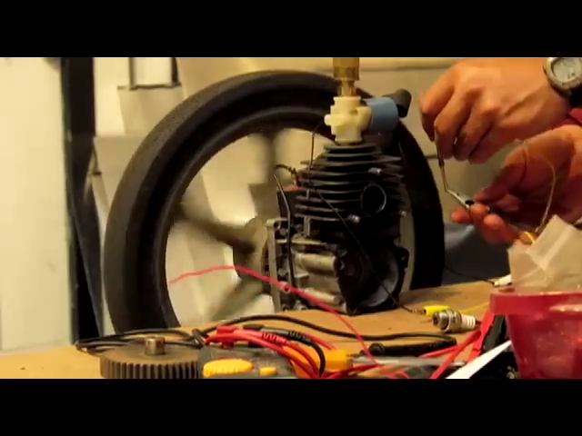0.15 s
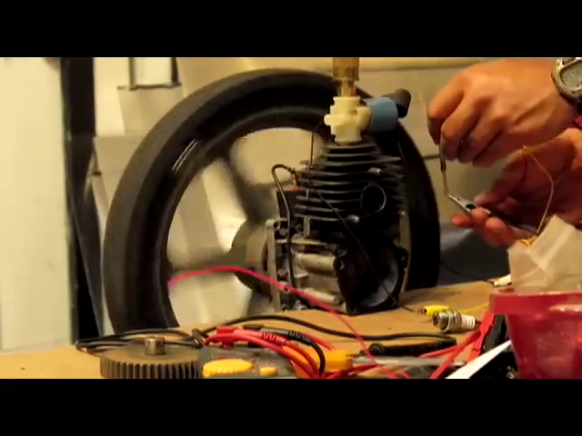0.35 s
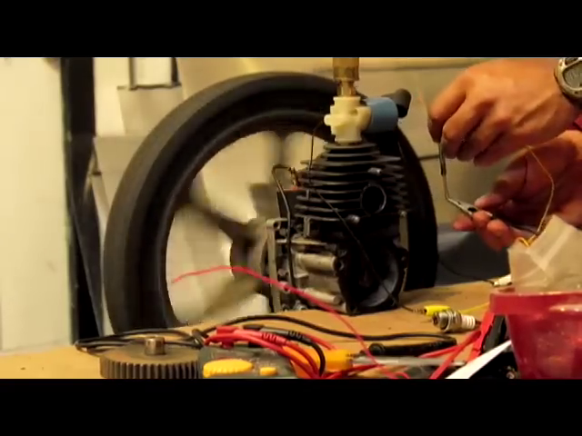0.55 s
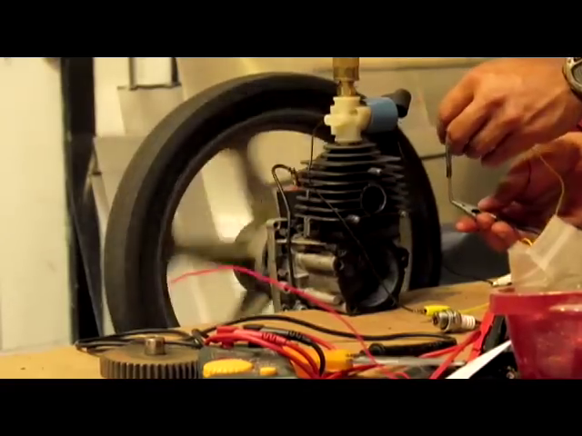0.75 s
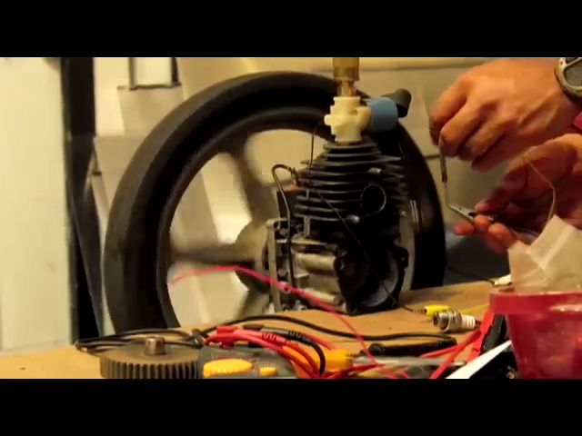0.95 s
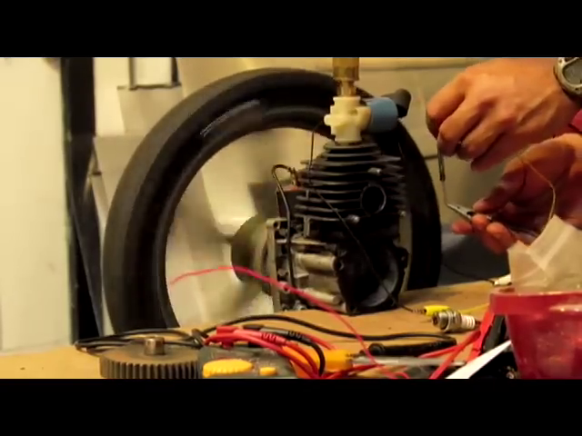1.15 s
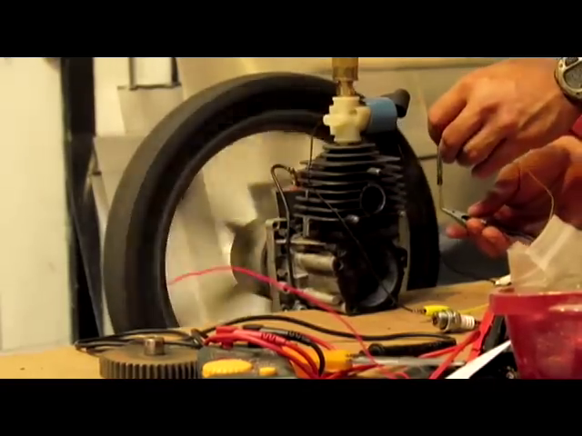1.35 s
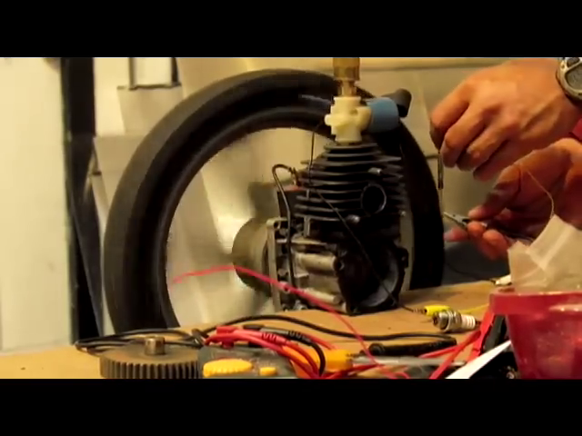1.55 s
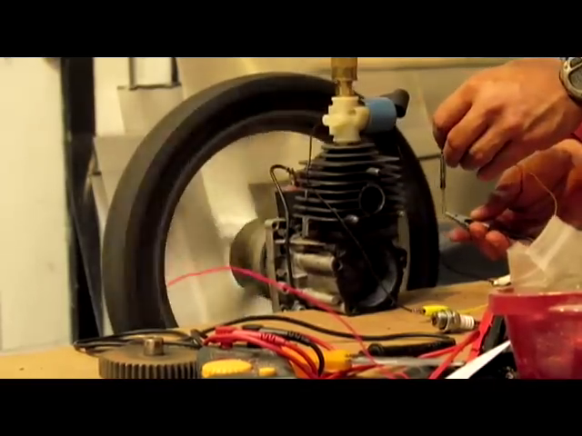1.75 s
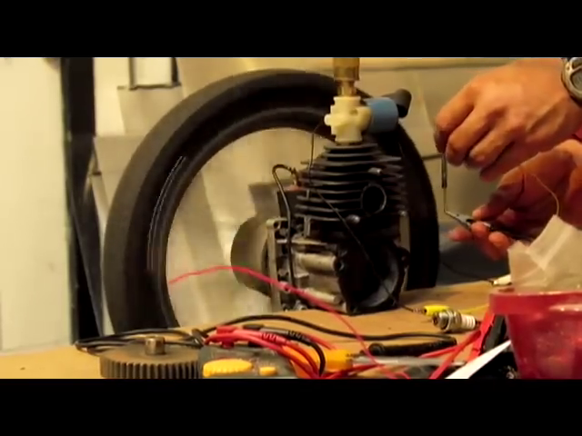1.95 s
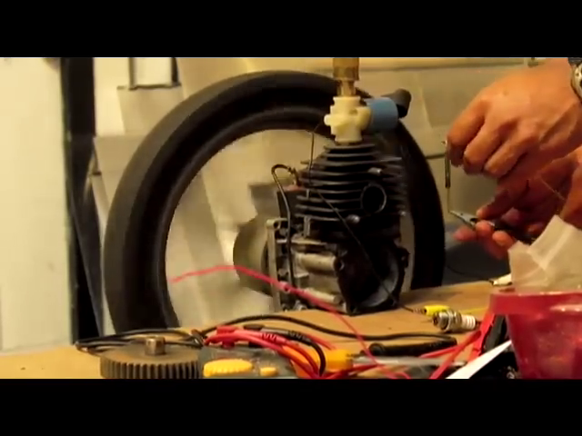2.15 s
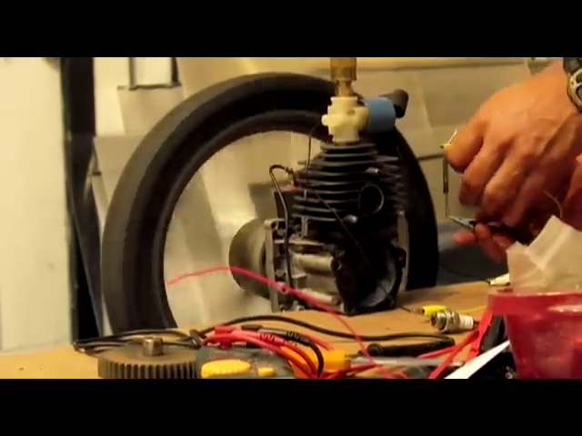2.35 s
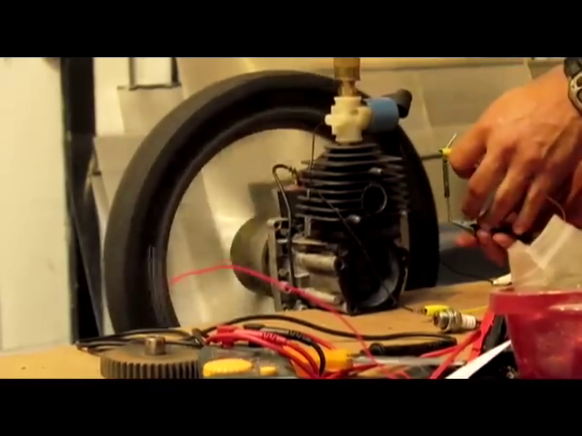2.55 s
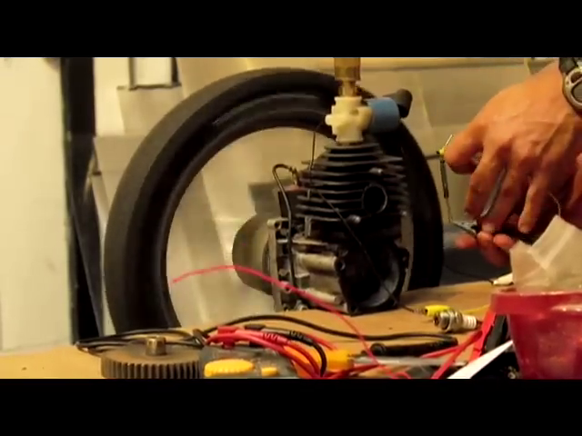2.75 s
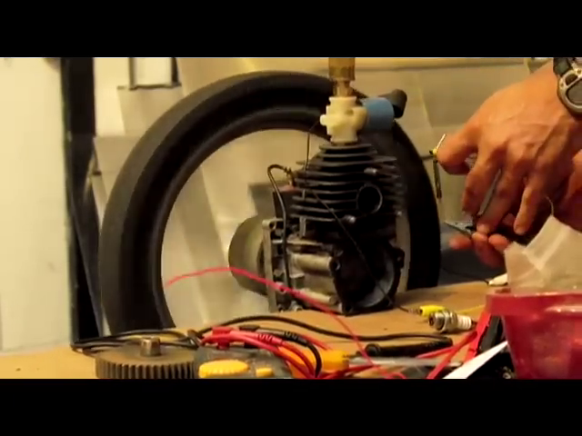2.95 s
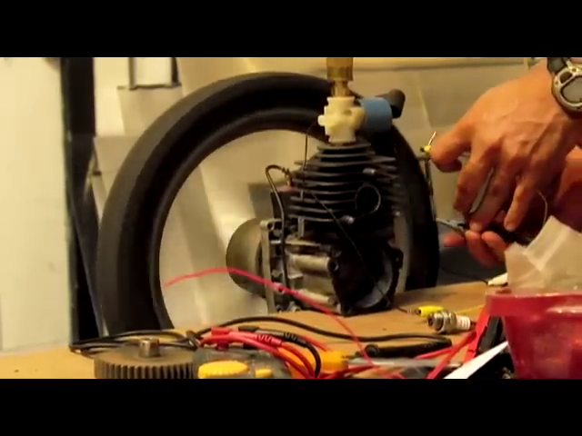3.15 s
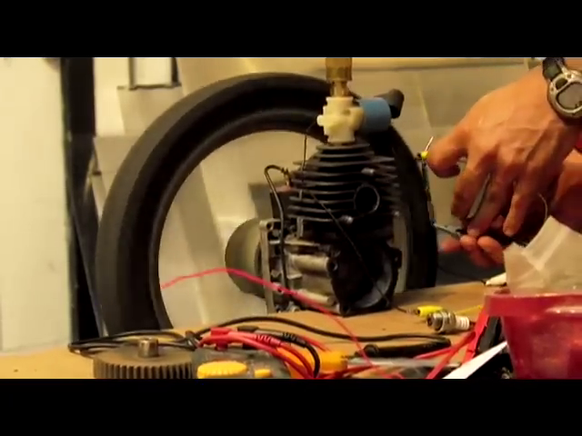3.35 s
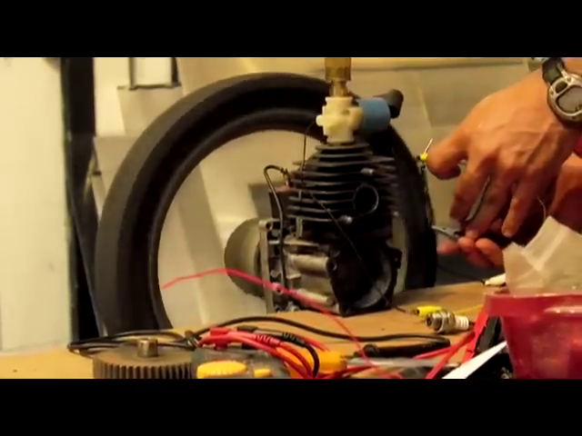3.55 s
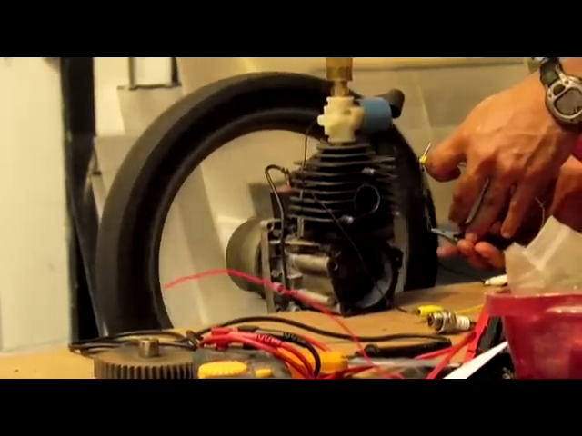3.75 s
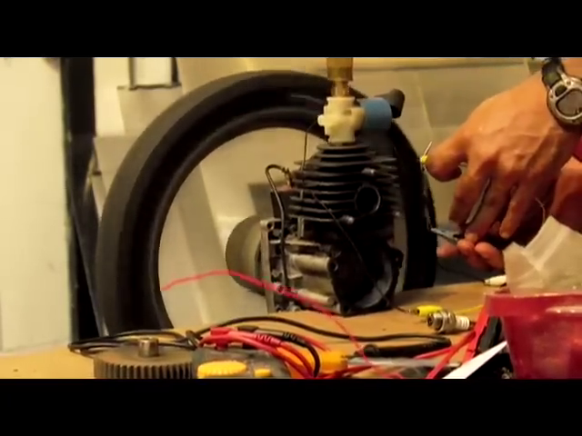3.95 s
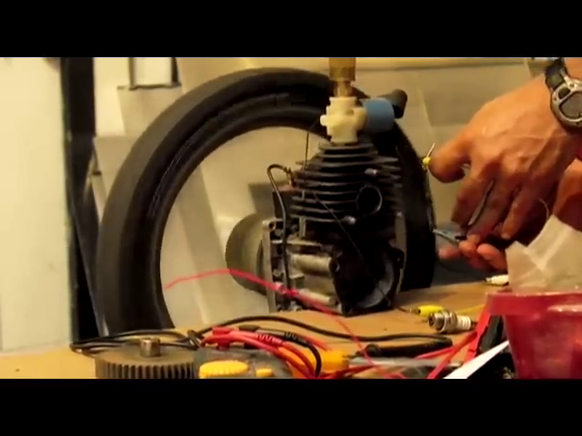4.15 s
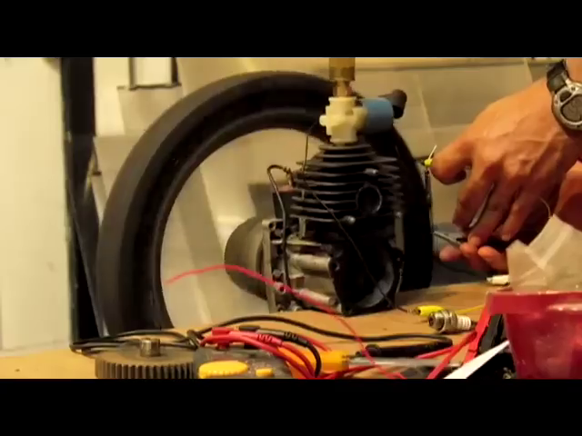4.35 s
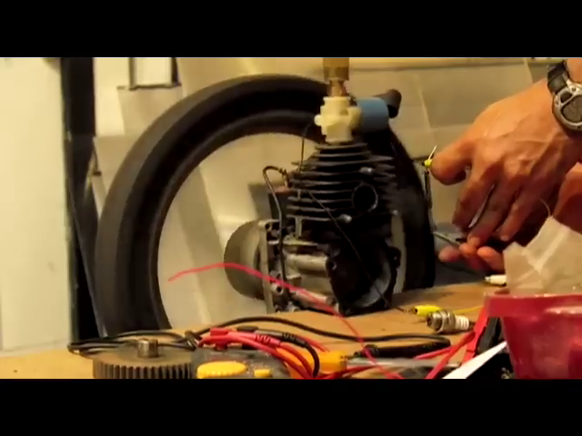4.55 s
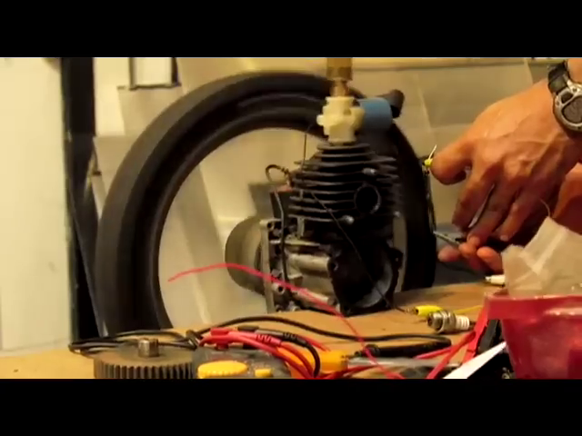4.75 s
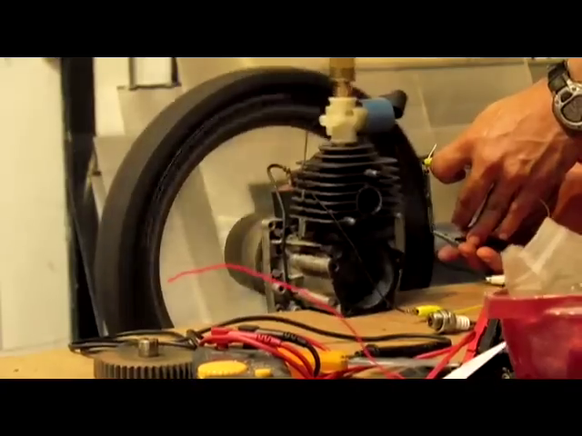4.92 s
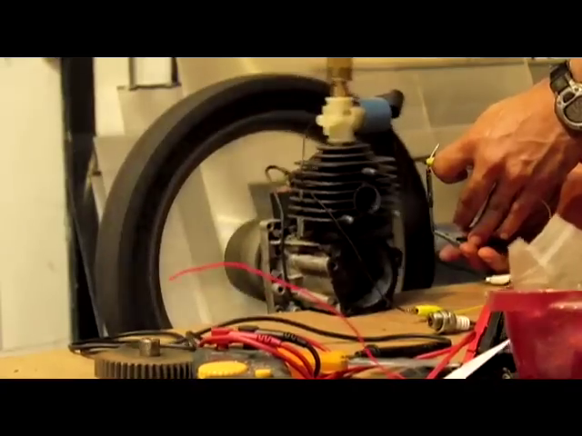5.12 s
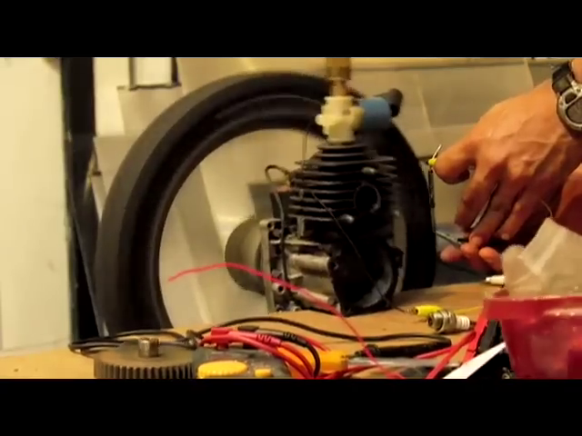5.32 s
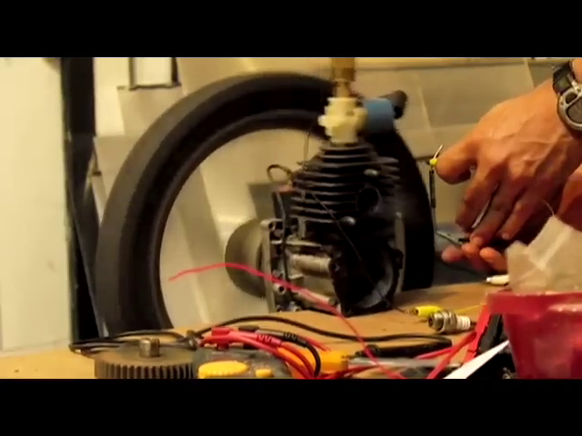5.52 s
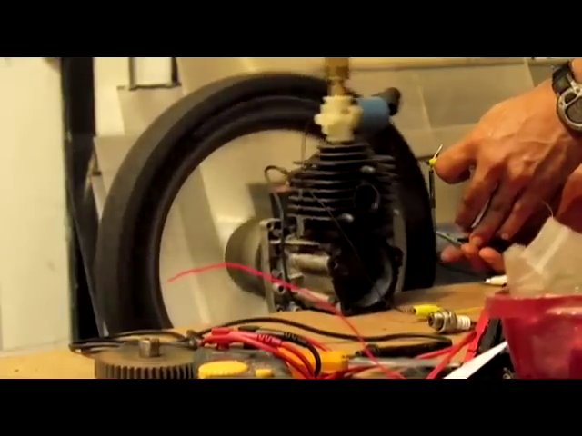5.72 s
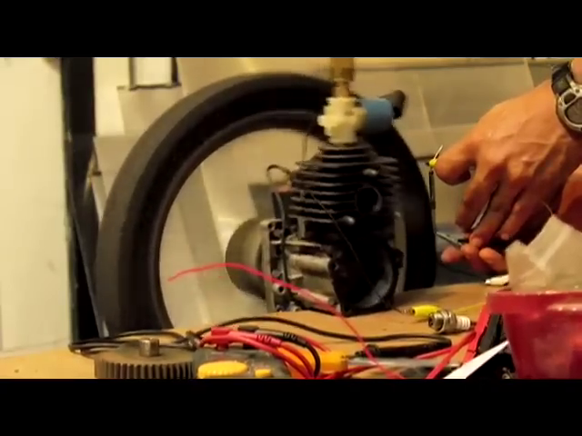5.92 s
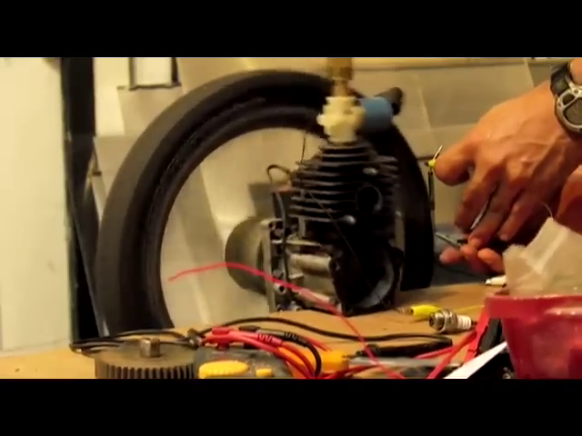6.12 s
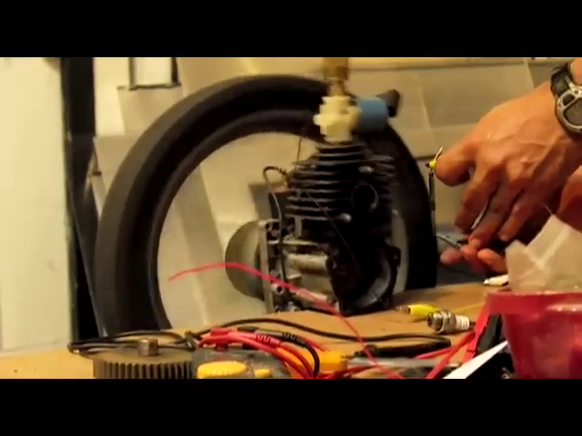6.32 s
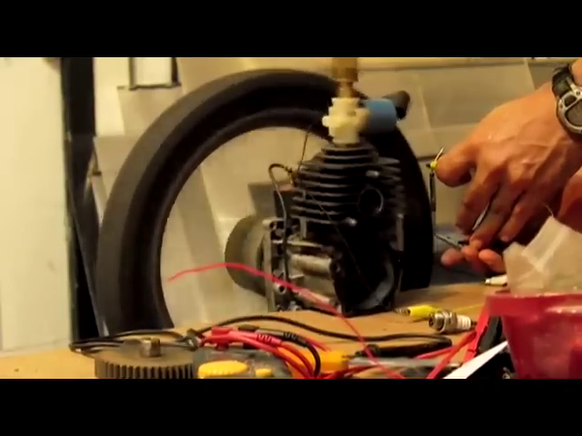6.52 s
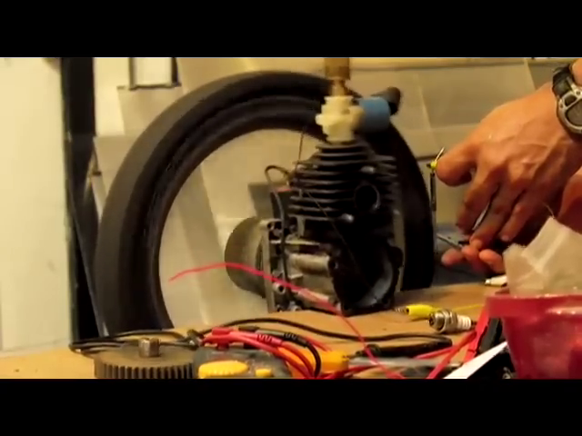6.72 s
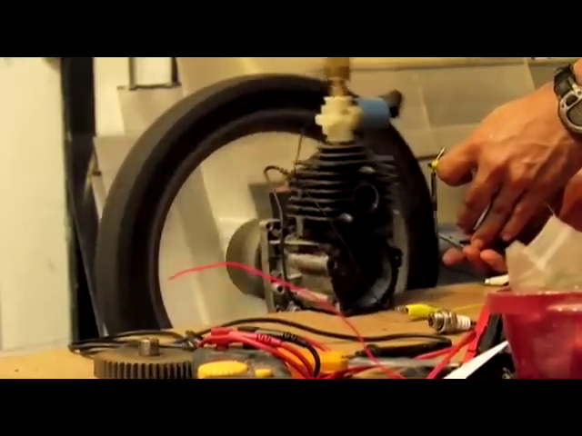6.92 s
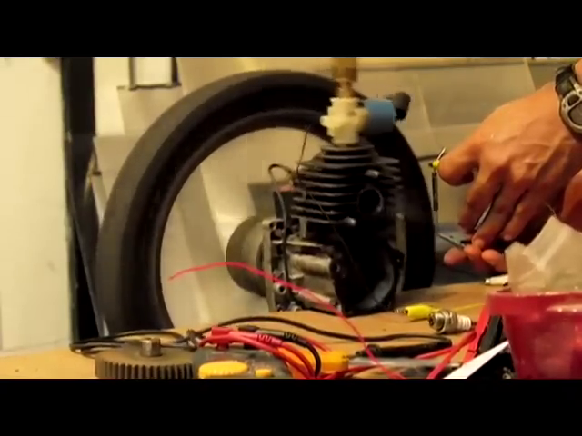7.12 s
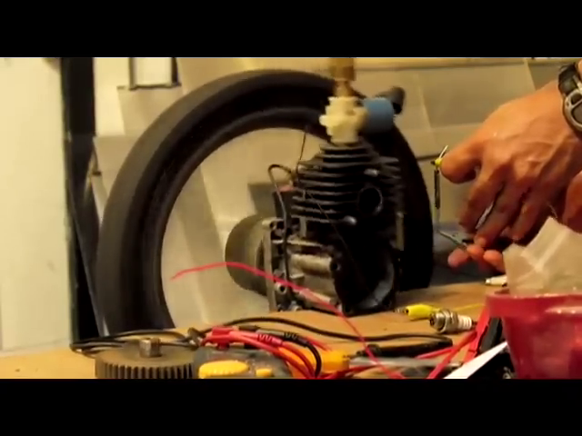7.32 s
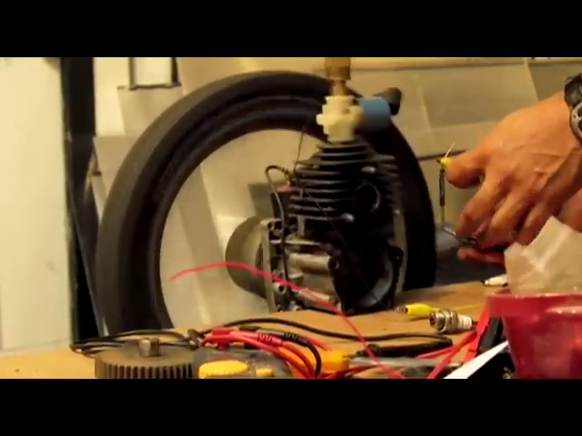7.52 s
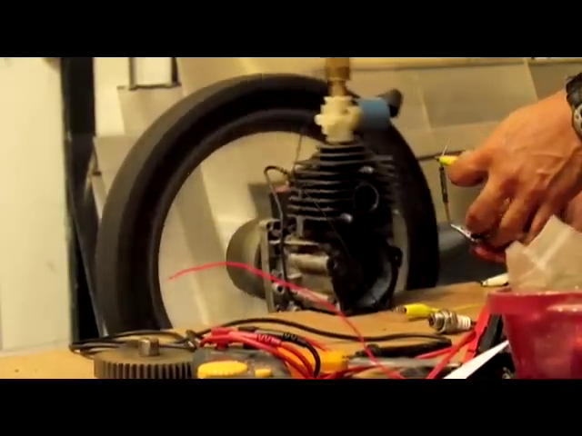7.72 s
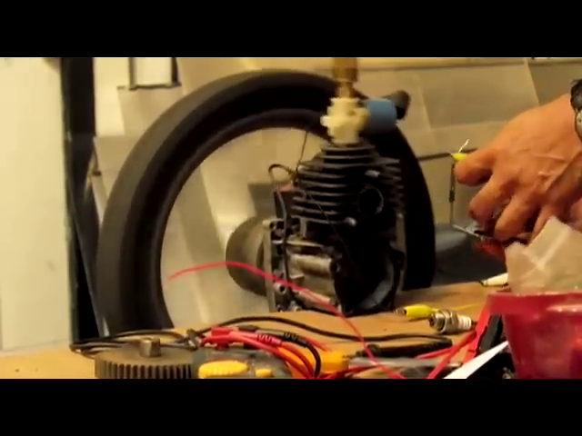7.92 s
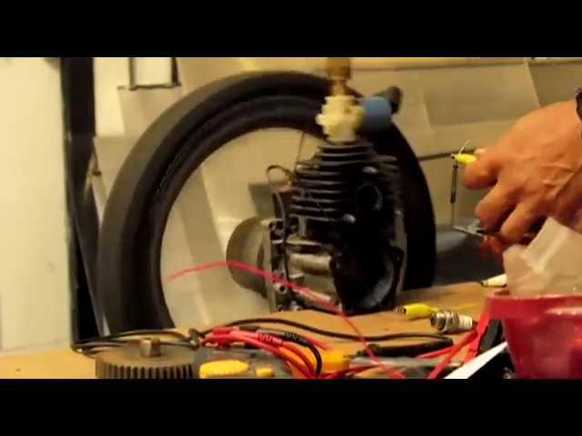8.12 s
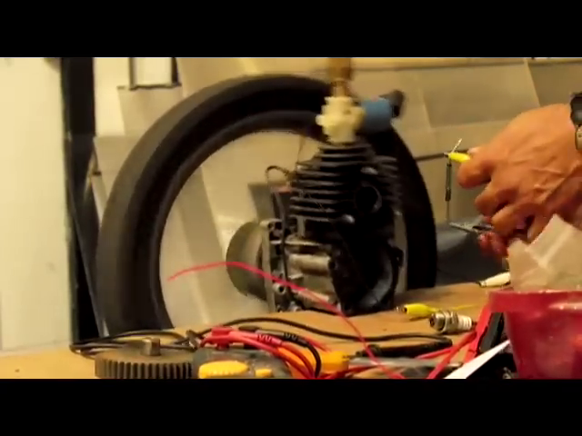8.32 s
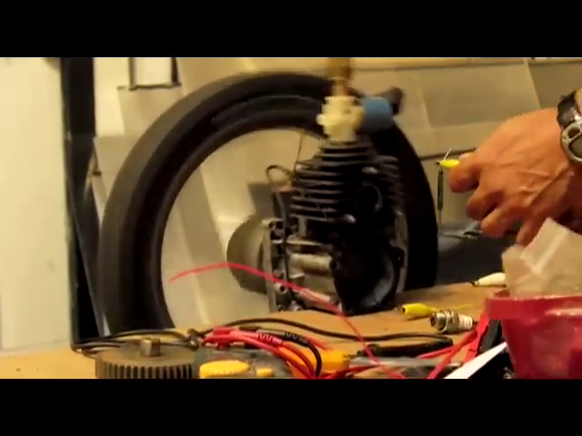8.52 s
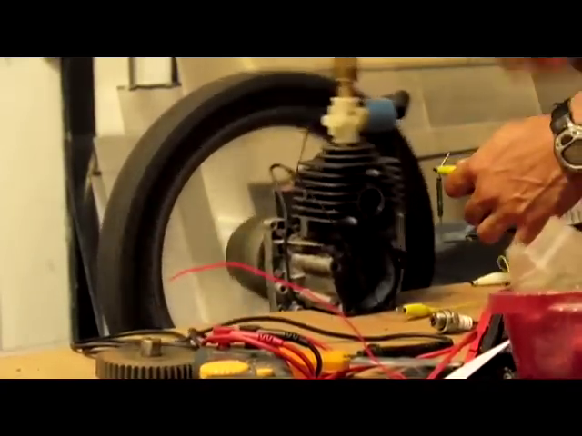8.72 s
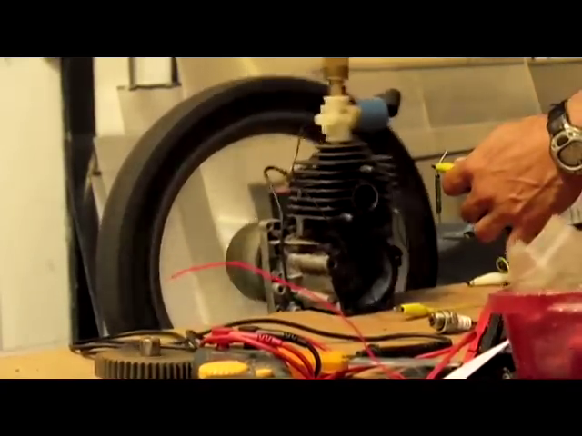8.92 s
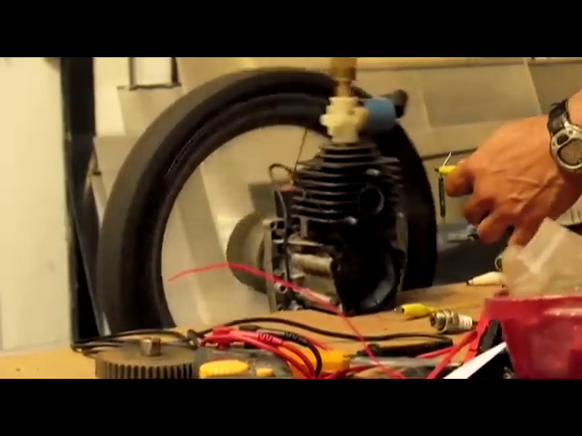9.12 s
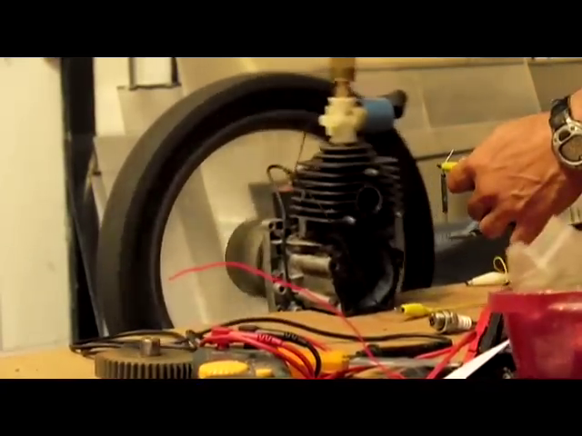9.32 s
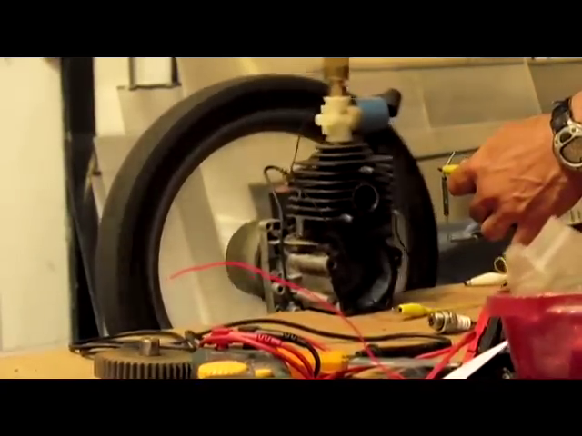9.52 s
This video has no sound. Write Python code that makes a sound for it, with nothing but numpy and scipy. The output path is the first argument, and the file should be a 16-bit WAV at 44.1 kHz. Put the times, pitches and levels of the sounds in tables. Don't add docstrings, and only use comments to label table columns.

```python
import sys
import numpy as np
from scipy import signal
from scipy.fft import rfft, irfft, next_fast_len
from scipy.io import wavfile
from scipy.ndimage import uniform_filter1d, minimum_filter1d

SR = 44100
rng = np.random.default_rng(int(sys.argv[2]) if len(sys.argv) > 2 else 0)


def volts_from_decibels(level):
    exponent = np.asarray(level, float) / 20
    return 10 ** exponent


def unload_wav(signal):
    wavfile.write(
        sys.argv[1],
        SR,
        np.round(np.clip(np.atleast_2d(signal).T, -1, 1) * 32767).astype(np.int16),
    )


N = 426447

# (frequency [Hz], width [Hz], level [dB])
CASE = [(173, 110, -5.5), (336, 12, -14), (520, 167, 5.5), (685, 55, 7.5), (820.6, 22.5, 16.5),
        (1020, 100, -34), (73, 19.5, 4.5)]
# (delay [s], share [1])
WALLS = [(.0048, .3), (.0152, .16), (.0205, -.17), (.0228, .2), (.0248, -.25), (.0276, .15), (.038, -.12),
         (.0605, .17)]
# (frequency [Hz], level [dB], t60 [s])
FITTING = [(900, -5, .04), (1040, 0, .07), (1150, -1, .16), (1250, -4, .07), (1450, -6, .05),
           (2000, -10, .06), (2300, -8, .025), (4600, -16, .1)]
# (frequency [Hz], level [dB], t60 [s])
KNOCK = [(1050, -1.5, .02), (1600, -8, .015), (2350, -4, .016), (3900, -7, .012), (5300, -14, .01)]
# (frequency [Hz], level [dB])
SNAP = [(300, -43), (800, 0.5), (1100, 0.5), (1800, -8), (2500, 0), (4000, -11.5), (6000, -18.5),
        (16000, -51)]
# (frequency [Hz], level [dB])
SOLENOID = [(700, -30), (950, -6), (1100, 0), (1230, -5), (1600, -30)]
# (frequency [Hz], level [dB])
PORT = [(300, -8), (1000, -10.5), (2200, -9), (3300, 5.5), (4100, 0.5), (5300, -8.5), (7200, -35.5),
        (10300, -15.5), (13000, -20), (16000, -68)]
# (frequency [Hz], level [dB])
JET = [(1000, -10.5), (3600, -2), (6500, -14.5), (8600, -17), (10300, 0), (11800, -4.5), (14000, -18),
       (16000, -25)]
# (frequency [Hz], level [dB])
RING_LEAK = [(3000, -2.5), (6500, -6.5), (8600, -8), (10300, 2.5), (12000, 1), (14500, -6.5), (16000, -9)]
# (frequency [Hz], level [dB])
SHOP_MID = [(25, -10), (70, -7.5), (200, -4), (400, -3), (600, -2.5), (1000, -8.5), (1800, -14),
            (3400, -25.5), (7000, -30), (16000, -45)]
SHOP_SIDE = [(25, -20), (90, -20.5), (250, -20), (600, -10), (1000, -9), (1800, -8), (3400, -14),
             (7000, -40), (16000, -35)]
# (frequency [Hz], level [dB])
HUM = [(118.4, -50.5), (242.2, -69), (398.4, -59.5)]
# (frequency [Hz], t60 [s])
SHOP_T60 = [(150, 0.36), (800, 0.31), (4000, 0.68), (10000, 0.43)]
# (frequency [Hz], side over mid [dB])
WIDTH = [(60, -10), (110, -16), (200, -20), (380, -12), (700, -6), (1290, 1), (2380, 7), (4400, 8),
         (15000, 8)]
# (frequency [Hz], correlation [1])
LIKENESS = [(100, -.3), (500, 0), (1300, -.15), (2400, -.35), (4400, 0), (9500, -.6), (13000, -.1)]
# (frequency [Hz], width [Hz])
NOTCHES = [(2850, 750), (5000, 250)]
# (frequency [Hz], level under the frame [dB])
MASK = [(2200, -40), (2850, -22), (3600, -35.5), (4500, -21.5), (5100, -13.5), (8500, -14), (9500, -29.5),
        (11500, -29.5), (13000, -17.5), (16000, -12)]
# (time [s], speed [turns/s])
SPEED = [(1.2, 1.0858), (1.55, 2.9196), (2.55, 3.6017), (3.85, 5.5381), (4.7, 6.6677), (5.55, 7.5292),
         (7.05, 8.6232), (7.65, 8.9539), (8.65, 6.6753), (9.4, 6.9445), (9.67, 6.2218)]
# (from [s], to [s])
AIR_OFF = [
    (7.65, 8.8),
    (9.25, 9.67),
]
# (time [s], thump pressure [1])
CHARGE = [
    (2.5, -0.11),
    (3.3, -0.21),
    (4.2, -0.23),
    (5.3, -0.22),
    (6.15, -0.29),
    (6.8, -0.28),
    (7.5, -0.26),
    (8.9, -0.33),
    (9.2, -0.29),
]
# (time [s], thump pressure [1], blowdown [dB], jet spit [dB])
ODD_STROKES = [
    (1.2011, -0.052, -30.5, -29),
    (1.651, .038, -20.5, -12),
    (1.9766, -0.12, -27.5, -18.5),
    (2.2713, -0.1, -37, -37),
    (7.5913, -0.18, -41, -28),
    (7.704, -.091, -54, -52),
    (8.5991, .069, -62, -57),
    (8.742, 0.051, -36, -45),
    (9.3316, -0.056, -60, -59),
    (9.6367, 0.088, -45.5, -59),
]
# (time [s], clack [dB], inlet rush [dB])
ODD_CLACKS = [(1.0086, -14, -44), (1.535, -16.5, -23.5), (1.8899, -21.5, -42), (2.195, -17.5, -30),
              (2.484, -26, -33), (2.752, -24, -30), (2.9976, -24, -45), (3.2255, -30, -23.5),
              (7.559, -31, -33), (7.6754, -29, -41.5), (7.7977, -28.5, -34), (7.9132, -26.5, -37),
              (8.5865, -33, -80), (8.7201, -18.5, -27), (8.8574, -27, -24), (9.0055, -28, -27),
              (9.15, -27, -23), (9.3002, -35, -38), (9.6104, -24.5, -33)]
# (time [s], level [dB])
BUMPS = [(.05, -37), (.54, -44), (.92, -45), (1.16, -35), (1.5, -40), (2.05, -52), (2.34, -37), (2.72, -45),
         (2.99, -41), (3.96, -38), (4.49, -50), (5.25, -49), (5.55, -49), (6.76, -50), (7.7, -43),
         (7.86, -42), (8.67, -37), (9.18, -52)]
# thump [1], then blowdown, spit, leak, clack, hiss, rush [dB]
SCATTER = [.02, 1.5, 1.6, 1.9, 3.2, 1.2, 5.5]

FIRST_S = 1.2007
SUCTION = 0.13
BLOW_DB, SPIT_DB, LEAK_DB = -24, -17.5, -35
EMPTY_DB = -51
SPIT_DB_PER_OCT, LEAK_DB_PER_OCT, HISS_DB_PER_OCT, CLACK_DB_PER_OCT = -2, -4.5, -3.5, -1
VALVE_LEAD, DRY_LEAD = .282, .23
CLACK_DB, HISS_DB, RUSH_DB = -31, -36, -36.5
DRY_CLACK_DB, DRY_HISS_DB, DRY_RUSH_DB = -27, -47.5, -35.5
DRY_STEADY = .2
REFILL_S, REFILL_DB = 9.7, 4.5
BLEED_DB, BLEED_S, BLEED_FALL_S = -32.5, 0.18, 0.043
VENT_DB, VENT_FALL_S = -33, .035
PUFF_S, PUFF_DB = .72, -54
SEEP_DB = -65.5
KNOCK_DB = 1
REED_DB = -35.5
BUMP_DB_PER_S, BENCH_DB = 124, -57


def turns():
    t = np.arange(FIRST_S, N / SR, 1 / SR)
    angle = np.cumsum(np.interp(t, *np.transpose(SPEED))) / SR
    s = np.interp(np.arange(int(angle[-1]) + 1), angle, t)
    turn = np.diff(s, prepend=0)
    octave = np.log2(.15 / np.minimum(turn, .3))
    dry = np.any([(s > a) & (s < b) for a, b in AIR_OFF], axis=0)
    luck = (rng.standard_normal((len(s), len(SCATTER))) * SCATTER).T

    empty = [[SUCTION], [EMPTY_DB], [EMPTY_DB]] + luck[:3] * [[.5], [2], [2]]
    spit = SPIT_DB + SPIT_DB_PER_OCT * octave
    charged = [np.interp(s, *np.transpose(CHARGE)), BLOW_DB + 0 * s, spit] + luck[:3]
    stroke = np.where(dry, empty, charged)
    slow_db = 55 * np.clip(turn - .33, 0, .35)
    leak = LEAK_DB + LEAK_DB_PER_OCT * octave - slow_db + luck[3]

    clack = CLACK_DB + CLACK_DB_PER_OCT * octave
    hiss = HISS_DB + HISS_DB_PER_OCT * octave + REFILL_DB * (s > REFILL_S)
    opening = np.where(dry, [[DRY_CLACK_DB], [DRY_RUSH_DB], [DRY_HISS_DB]], [clack, RUSH_DB + 0 * s, hiss])
    opening = opening + luck[[4, 6, 5]] * np.where(dry, DRY_STEADY, 1)

    strokes = replaced(np.transpose([s, *stroke, leak]), ODD_STROKES)
    at = strokes[:, 0] - np.where(dry, DRY_LEAD, VALVE_LEAD) * np.minimum(turn, .7)
    return strokes, replaced(np.transpose([at, *opening]), ODD_CLACKS)


def replaced(rows, odd):
    rows, odd = np.array(rows), np.array(odd)
    nearest = abs(rows[:, 0] - odd[:, :1]).argmin(axis=1)
    rows[nearest, :odd.shape[1]] = odd
    return rows


def crank(strokes):
    s = strokes[:, 0]
    turn = np.diff(s, prepend=s[0] - .8)
    return s, turn, 0.00572 + 0.0366 * turn


def thump(strokes):
    s, turn, lead = crank(strokes)
    size = strokes[:, 1]
    charge = np.minimum(size, 0)

    def spike(f, at, g, width):
        pulses = (g * np.exp(-2j * np.pi * f[:, None] * at)).sum(1)
        return pulses * np.exp(-(np.pi * f * width) ** 2) * width

    def steps(f):
        low = f[f < 4000]
        snap = spike(low, s, size, .0004)
        snap = snap - spike(low, s - .0026, .45 * charge, .0008)
        snap = snap - spike(low, s - .0016, .35 * (size - charge), .001)
        opening = spike(low, s - lead * .58, .22 * charge, .001)
        opening = opening + spike(low, s - lead, .12 * charge, .0005)
        opening = opening - spike(low, s - lead * .86, .15 * charge, .0005)
        return np.pad(snap + opening, (0, np.sum(f >= 4000)))

    def response(f):
        case = 1 + 0.99 * sum(volts_from_decibels(db) * 1j * f * w / (c * c - f * f + 1j * f * w) for c, w, db in CASE)
        walls = 1 + f / (f + 150) * sum(g * np.exp(-2j * np.pi * f * d) for d, g in WALLS)
        return steps(f) * case * walls * f ** 3 / (60 ** 3 + f ** 3)

    return shop(filtered(np.eye(1, N)[0], response) * SR * 1.613, wet_db=-7, count=14)


def exhaust(strokes):
    s, turn, lead = crank(strokes)
    blow_db, spit_db, leak_db = strokes.T[2:]
    blow = gate(s - lead, lead + 0.001, blow_db - 3.5, rise=lead, fall=0.023 + 0.053 * turn)
    roar = blow * air(PORT, 4730, tumble_db=4.0)
    spit = gate(s - lead, .2 * lead, spit_db - 8.5, rise=.15 * lead, fall=.3 * lead)
    second_db = spit_db - 2 - 250 * (lead - .01)
    spit = spit + gate(s - .56 * lead, .17 * lead, second_db, rise=.12 * lead, fall=.14 * lead)
    trail = gate(s - lead, lead, spit_db - 25, rise=0.0029, fall=0.21 * turn)
    jet = np.hypot(spit, trail) * air(JET, 8780, tumble_db=0.5)
    leak = gate(s - 0.59 * turn, 0.25 * turn, leak_db - 8, rise=0.14 * turn, fall=0.12 * turn)
    turning = np.arange(N) > 1.25 * SR
    return roar + jet + leak * air(RING_LEAK, 9400, tumble_db=2.5) * turning


def inlet(strokes, openings):
    s, clack_db, rush_db, hiss_db = openings.T
    held = strokes[:, 0] - s
    bleed = gate([-.01, PUFF_S], [BLEED_S, .09], [BLEED_DB, PUFF_DB], rise=[.01, .07], fall=[BLEED_FALL_S, .02])
    hiss = gate(s, held, hiss_db + 0.5, rise=0.0033, fall=0.024 + 0.032 * held) + bleed + volts_from_decibels(SEEP_DB)
    vent = gate(-.01, .01, VENT_DB, rise=.01, fall=VENT_FALL_S)
    rush = gate(s, held, rush_db - 6, rise=0.00039, fall=0.0083) + vent
    return hiss * air(JET, 10800, tumble_db=4.5) + rush * air(PORT, 3700, tumble_db=5.0)


def valve(openings):
    x, t = np.zeros(N + SR), np.arange(SR // 4) / SR
    s, clack_db, rush_db, hiss_db = openings.T
    dryness_db = np.clip(clack_db - hiss_db - 23, -15, 0)
    for at, level_db, damping in zip(s, clack_db, 1.6 - volts_from_decibels(dryness_db)):
        ring, knock = 0, 0
        for hz, db, t60 in FITTING:
            decay = volts_from_decibels(db + rng.normal(0, 3.8) - 60 * damping * t / t60)
            ring = ring + decay * np.sin(2 * np.pi * hz * (1 + rng.normal(0, 0.045)) * t)
        for hz, db, t60 in KNOCK:
            knock = knock + volts_from_decibels(level_db + KNOCK_DB + db - 60 * t / t60) * np.sin(2 * np.pi * hz * t)
        onset = 1 - np.exp(-t / 0.00099)
        x[round((at - .001) * SR):][:len(t)] += volts_from_decibels(level_db - 20.5) * ring * onset + knock
    snap = gate(s - .001, 0.0015, clack_db - 11.5, rise=.0005, fall=0.0047)
    tick = gate(s - .007, .004, clack_db - 13 + 3.5 * dryness_db, rise=.002, fall=.004)
    rattle = gate(s - .001, .003, clack_db - 6 + 1.2 * dryness_db, rise=.001, fall=.02)
    clack = np.hypot(snap, tick) * air(SNAP, 666, tumble_db=3.5)
    return x[:N] + clack + rattle * air(SOLENOID, 1100, tumble_db=1.5)


def reed(strokes):
    s, size = strokes.T[:2]
    sucks = size > .09
    level_db = REED_DB + rng.normal(0, 1.6, len(s))[sucks]
    swell = gate(s[sucks] + 0.0024, 0.0052, level_db, rise=0.0051, fall=0.015)
    return swell * air([(1500, -50), (1900, -8), (1990, -2.5), (2090, -1), (2600, -60)], 1990, tumble_db=0)


def background():
    t = np.arange(N) / SR
    noise = filtered(rng.standard_normal((2, N)), lambda hz: volts_from_decibels([along(SHOP_MID, hz), along(SHOP_SIDE, hz)]))
    drift = np.cumsum(rng.standard_normal((len(HUM), N)), axis=1) * 0.016
    hum = sum(volts_from_decibels(db + 1) * np.sin(2 * np.pi * hz * t + d) for (hz, db), d in zip(HUM, drift))
    lumps_db = np.max([db - BUMP_DB_PER_S * abs(t - s) for s, db in BUMPS], axis=0)
    rumble = filtered(rng.standard_normal((2, N)), lambda hz: hz / 25 / (1 + (hz / 45) ** 4))
    rumble = volts_from_decibels(np.maximum(lumps_db, BENCH_DB) - 4) * rumble / np.std(rumble) * [[1], [.6]]
    return volts_from_decibels(-40.5) * noise / np.std(noise[0]) + [hum, 0.067 * hum] + rumble


def shop(x, wet_db, count):
    out, edges = np.zeros((3, N + SR)), np.linspace(0, N, count + 1).astype(int)
    for a, b in zip(edges, edges[1:]):
        hz, t, z = signal.stft(rng.standard_normal((2, SR // 2)), SR, nperseg=256)
        tail = signal.istft(z * volts_from_decibels(-60 * t / along(SHOP_T60, hz)[:, None]), SR, nperseg=256)[1]
        tail = volts_from_decibels(wet_db) * np.pad(tail / np.linalg.norm(tail[0]), [(0, 0), (150, 0)])
        phase = np.cumsum(rng.normal(0, .5, 129))
        bench = np.roll(irfft(np.exp(1j * phase)), 40)
        bench = np.pad(bench, (0, tail.shape[1] - len(bench)))
        wet = signal.fftconvolve(x[None, a:b], np.vstack([tail, bench]), axes=1)
        out[:, a:a + wet.shape[1]] += wet
    mid, side, scatter = out[:, :N]
    alike = filtered(x + mid, lambda hz: along(LIKENESS, hz))
    unlike = filtered(scatter, lambda hz: (1 - along(LIKENESS, hz) ** 2) ** .5)

    def share(hz):
        return 1 / (1 + volts_from_decibels(along(WIDTH, hz) * [[2], [-2]])) ** .5

    return filtered(np.array([x + mid, side + alike + unlike]), share)


def air(spectrum, ref_hz, tumble_db):
    z = signal.stft(rng.standard_normal(N), nperseg=128)[2]
    eddies = uniform_filter1d(rng.standard_normal(z.shape), size=2, axis=0)
    eddies = uniform_filter1d(eddies, size=6, axis=1)
    x = signal.istft(z * volts_from_decibels(tumble_db * eddies / eddies.std()), nperseg=128)[1][:N]
    x = filtered(x, lambda hz: volts_from_decibels(along(spectrum, hz)))
    return x / np.std(filtered(x, lambda hz: abs(np.log(hz / ref_hz + 1e-9)) < .2))


def gate(start, hold, db, rise, fall):
    power, t = np.zeros(N), np.arange(N) / SR
    for s, h, level, r, f in np.broadcast(start, hold, db, rise, fall):
        first = max(round(s * SR), 0)
        u = t[first:][:SR // 2] - s
        shape = np.clip(u / r, 0, 1) ** 2 * np.exp(-2 * np.maximum(u - h, 0) / f)
        power[first:][:SR // 2] += volts_from_decibels(level) ** 2 * shape
    return np.sqrt(power)


def along(points, hz):
    f, v = np.transpose(points)
    return np.interp(np.log(hz + 1), np.log(f + 1), v)


def filtered(x, response):
    m = next_fast_len(N + SR)
    return irfft(rfft(x, m) * response(np.fft.rfftfreq(m, 1 / SR)), m)[..., :N]


def scene():
    strokes, openings = turns()
    engine = thump(strokes)
    flows = shop(exhaust(strokes) + inlet(strokes, openings), wet_db=-8.5, count=30)
    clatter = shop(valve(openings) + reed(strokes), wet_db=-4.5, count=30)
    mid, side = engine + flows + clatter + background()
    return np.array([mid + side, mid - side])


def thin_mid(mid, side):
    frame = dict(fs=SR, window=("tukey", .4), nperseg=1280, noverlap=256)
    offset = 483
    mid, side = np.roll([mid, side], -offset, axis=1)
    hz, t, z = signal.stft([mid, side], **frame)
    bands = np.add.reduceat(abs(z[0]) ** 2, np.arange(0, len(hz), 15), axis=0) / 15
    loudness = np.sqrt(np.mean(abs(z) ** 2, axis=(0, 1)))
    limit = volts_from_decibels(along(MASK, hz[::15] + 250) + 10)[:, None] * loudness ** .6
    limit = limit * volts_from_decibels(-25 + 5.5 * rng.standard_normal(bands.shape))
    treble = np.diff(side, 2, prepend=[0, 0]) ** 2
    before = np.roll(abs(uniform_filter1d(treble, size=1024)), 600)
    jump = uniform_filter1d(treble, size=128) / (before + 1e-12)
    highest = -minimum_filter1d(-jump, size=1024)
    attack = highest[np.minimum((t * SR).astype(int), N - 1)] > 5.2
    keep = np.repeat((np.sqrt(bands) > limit) | attack, 15, axis=0)[:len(hz)]
    return np.roll(signal.istft(z[0] * keep, **frame)[1][:N], offset)


def roll_off(x):
    return signal.sosfilt(signal.butter(12, 16190, fs=SR, output="sos"), x)


def record(dry):
    def housing(f):
        notches = [(c * c - f * f + .08j * f * w) / (c * c - f * f + 1j * f * w) for c, w in NOTCHES]
        return np.prod(notches, axis=0) * (f < 16100)

    dry = dry / (1 + abs(dry / .75) ** 4) ** .25
    left, right = filtered(dry, housing)
    side = (left - right) / 2
    mid = thin_mid((left + right) / 2, side)
    return roll_off(np.array([mid + side, mid - side]))


dry = scene()
out = record(dry)
unload_wav(out)
```